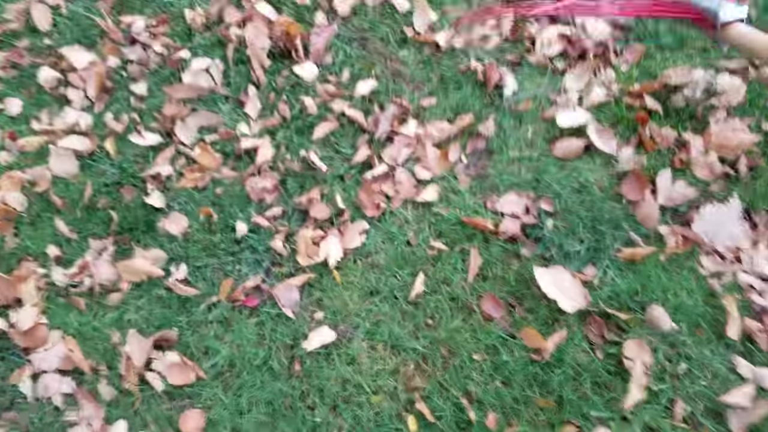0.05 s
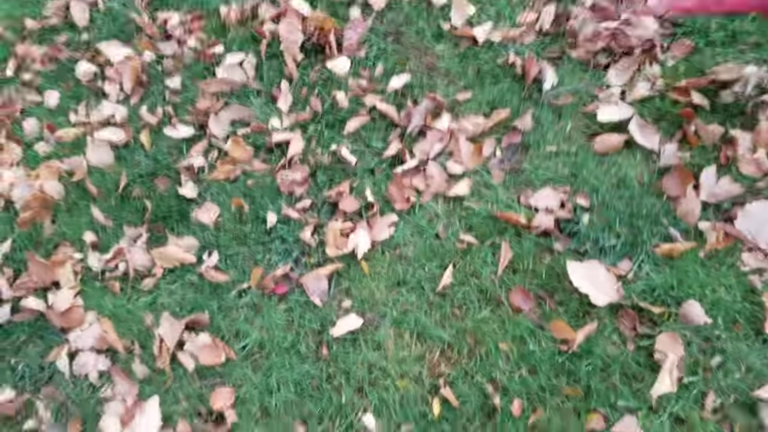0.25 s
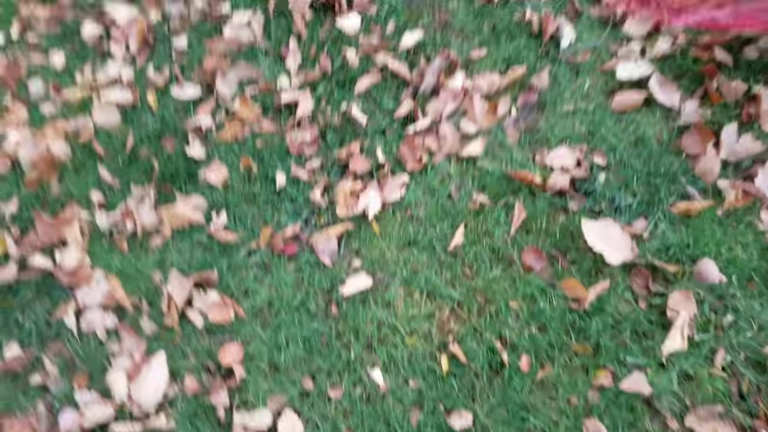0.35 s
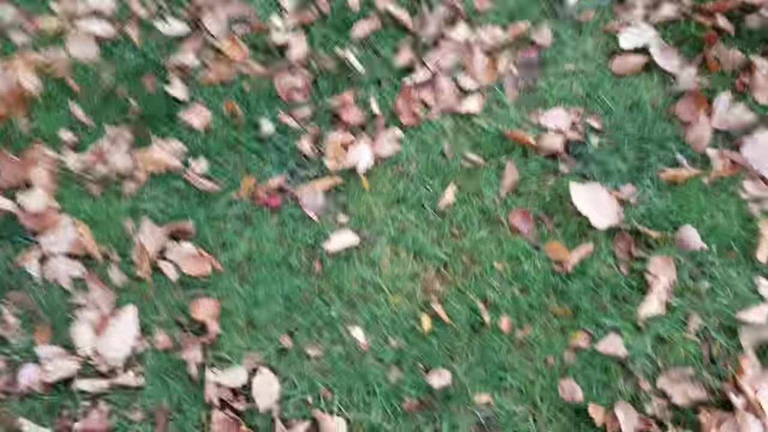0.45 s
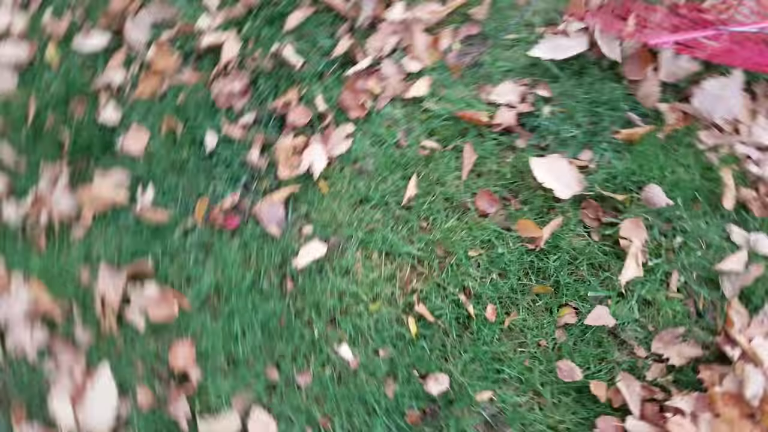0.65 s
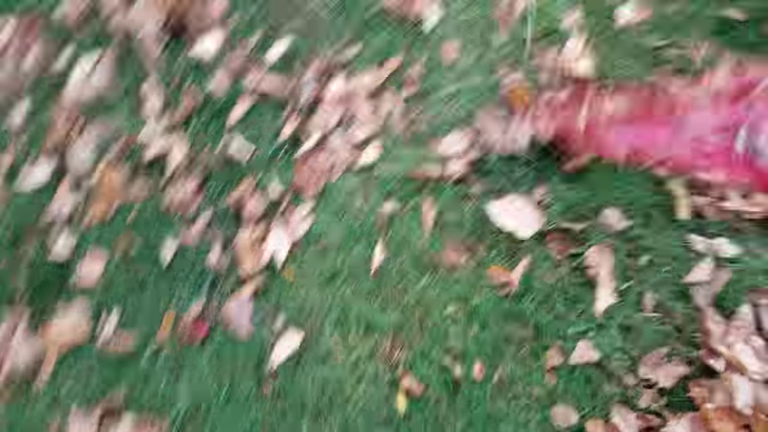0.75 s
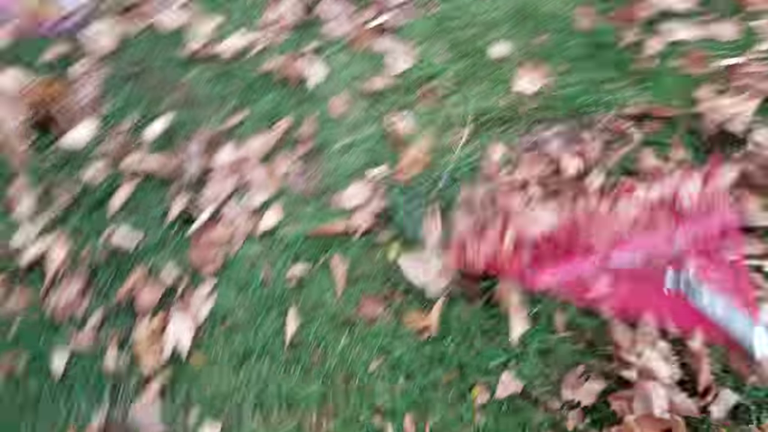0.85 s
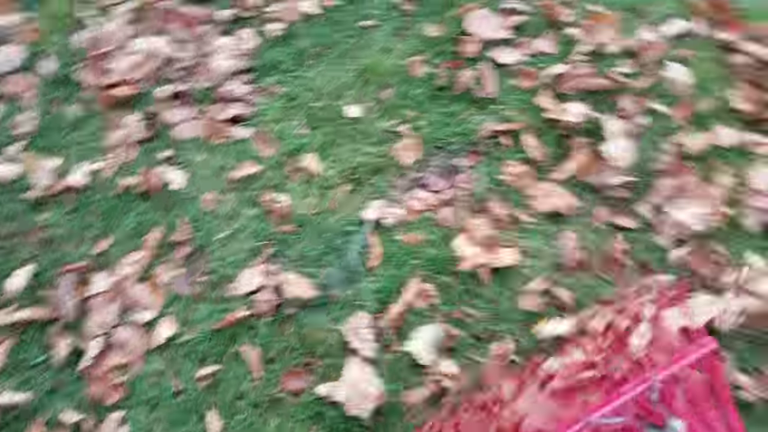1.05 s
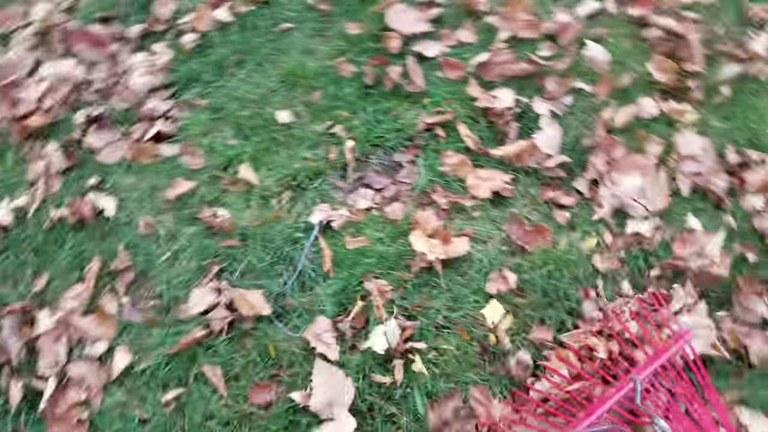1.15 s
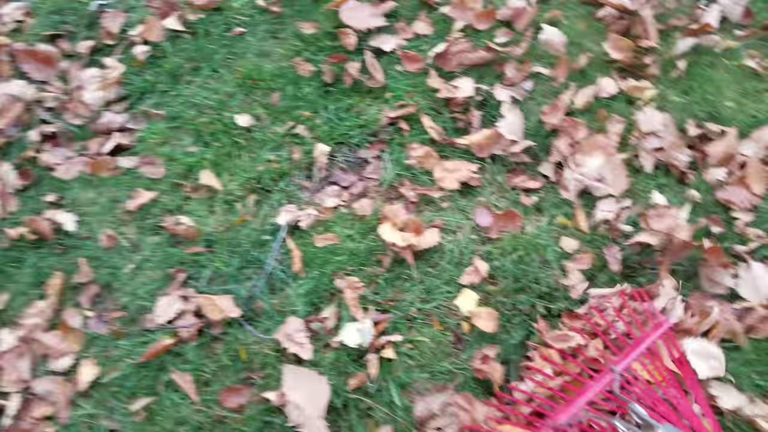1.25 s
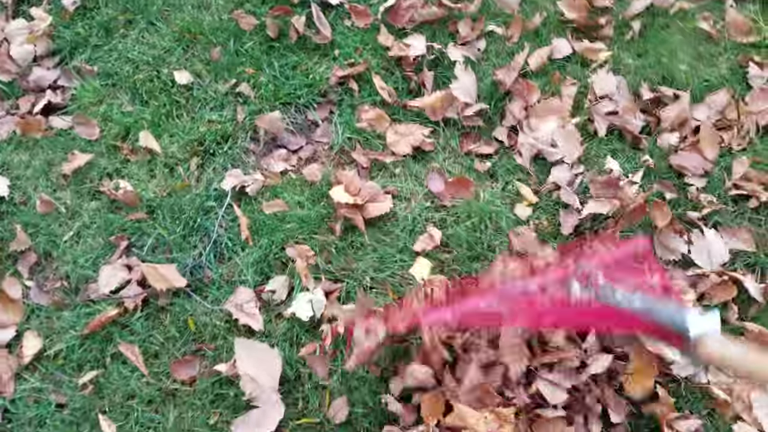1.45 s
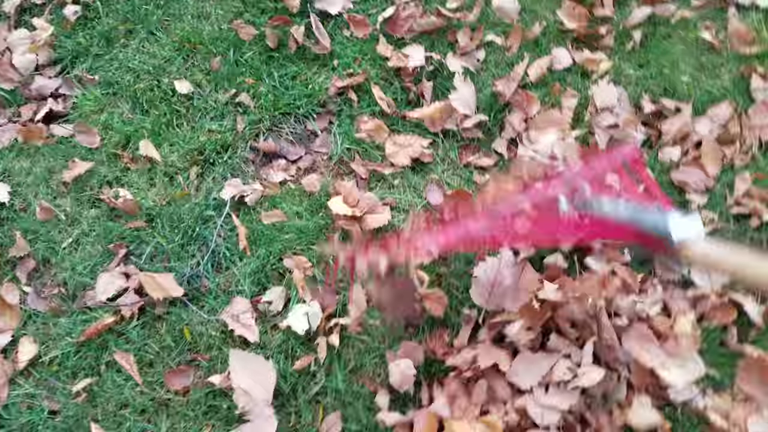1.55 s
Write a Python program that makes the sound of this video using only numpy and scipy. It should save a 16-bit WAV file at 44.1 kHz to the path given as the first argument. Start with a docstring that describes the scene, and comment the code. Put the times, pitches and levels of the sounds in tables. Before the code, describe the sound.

A plastic rake lands on a lawn with a soft thud and two dull knocks, then scrapes close past through crackling dry leaves. A few leaves snap before the stroke fades into a soft rustle and low handling rumble.

```python
"""A soft thud and two dull knocks: a plastic rake lands on a lawn and is pulled once past the listener.
Dry leaves buckle in thousands of tiny damped rings that merge into a dense crackle, lower where they
pile up. The tines scrape through the grass, clumps crunch and single brittle leaves snap.
The stroke dies away in a soft rustle and a low handling rumble, over a faint outdoor background."""
import sys
import numpy as np
from scipy import signal
from scipy.fft import rfft, irfft, next_fast_len
from scipy.io import wavfile
from scipy.ndimage import uniform_filter1d, map_coordinates

SR = 44100
rng = np.random.default_rng(int(sys.argv[2]) if len(sys.argv) > 2 else 0)


def wrap_up_sound(samples):
    """Save the sound to the file named by the first command line argument, as 16-bit audio."""
    columns = np.atleast_2d(samples).T
    # keep every value between -1 and 1, then stretch to whole-number steps
    tamed = np.clip(columns, -1, 1)
    steps = np.round(tamed * 32767).astype(np.int16)
    wavfile.write(sys.argv[1], SR, steps)


N = 70560


def amp(db):
    """Amplitude ratio of a level in decibels."""
    return 10 ** (np.asarray(db) / 20)


def unit(x):
    """Normalisation to rms 1."""
    return x / np.sqrt(np.mean(x ** 2) + 1e-20)


def along(points, hz):
    """Interpolation of (frequency_hz, value) points on a logarithmic frequency axis."""
    f, v = np.transpose(points)
    return np.interp(np.log(hz + 1), np.log(f + 1), v)


def curves(rows):
    """Linear envelopes, one for each column after time_s."""
    time_s, *columns = np.transpose(rows)
    return [np.interp(np.arange(N) / SR, time_s, c) for c in columns]


def wobble(rate_hz):
    """Random modulation: a spline through rate_hz Gaussian values a second."""
    return map_coordinates(rng.standard_normal(4096), [np.arange(N) * rate_hz / SR], mode="wrap")


def filtered(x, response):
    """Zero-phase filtering: the spectrum of x times a frequency response."""
    m = next_fast_len(N + SR // 2)
    return irfft(rfft(x, m) * response(np.fft.rfftfreq(m, 1 / SR)), m)[..., :N]


def coloured(x, spectrum):
    """Spectral shaping by (frequency_hz, gain_db) points, at rms 1."""
    return unit(filtered(x, lambda hz: amp(along(spectrum, hz))))


def band(x, centre_hz, width):
    """Band-pass filtering with a bell of the given relative width, at rms 1."""
    return unit(filtered(x, lambda hz: np.exp(-(np.log((hz + 1) / centre_hz) / width) ** 2)))


def steadied(x, size):
    """Division by the running rms evens out chance swells over size samples."""
    power = np.mean(np.atleast_2d(x) ** 2, axis=0)
    power = uniform_filter1d(uniform_filter1d(power, size), size)
    return unit(x / np.sqrt(np.abs(power) + 1e-6))


def grains(pitch_hz, scatter, cycles, size_db, spread_ms, count, size):
    """Superposition of tiny damped rings, each with its own left-right delay, whitened as a whole."""
    # Bearing of the stirred leaves, a little to the right: time_s, left_delay_ms, relative_width
    bearing = [(.25, 0.19, 0.93), (.42, 0.19, 0.76), (.6, 0.23, 1.34), (.85, 0.16, 1.03),
               (1.15, 0.12, 0.77), (1.5, 0.11, 1.3)]
    start = rng.uniform(0, N - 1, count)
    hz = pitch_hz * np.exp(scatter * rng.triangular(-2.2, 0, 2.2, count))
    hz = np.clip(hz, 200, SR * .4)[:, None]
    gain = amp(size_db * np.clip(rng.standard_normal(count), -2, 2)) * rng.choice([-1, 1], count)
    delay_ms, width = (c[start.astype(int)] for c in curves(bearing))
    lag = (delay_ms + width * spread_ms * rng.standard_normal(count)) * SR / 1000
    pair = []
    for arrival in (start + lag / 2, start - lag / 2):
        index = np.ceil(arrival).astype(int)[:, None] + np.arange(size)
        turns = (index - arrival[:, None]) * hz / SR
        ring = gain[:, None] * np.sqrt(hz) * np.sin(2 * np.pi * turns) * np.exp(-turns / cycles)
        pair.append(np.bincount(index.ravel() % N, ring.ravel(), N))
    spectrum = rfft(np.array(pair))
    power = uniform_filter1d(np.mean(np.abs(spectrum) ** 2, axis=0), size=900)
    return unit(irfft(spectrum / np.sqrt(np.abs(power) + 1e-9), N))


def blows(rows, source, width, attack_s):
    """Impact excitation: each row starts a band of the source that rises fast and decays exponentially."""
    out = 0
    for start_s, level_db, centre_hz, t60_s in rows:
        age = np.maximum(np.arange(N) / SR - start_s, 0)
        envelope = (1 - np.exp(-age / attack_s)) * amp(level_db - 60 * age / t60_s)
        out = out + envelope * steadied(band(source, centre_hz, width), size=400)
    return out


def crackle(level_db):
    """Buckling leaves emit clicks so dense that they fuse; sparser ticks of leaf edges stand out."""
    # Spectrum of dry leaves: frequency_hz, gain_db
    spectrum = [(300, -31), (1000, -19.5), (2300, -4.5), (4000, -5), (7000, -4), (7900, -3), (8600, -9.5),
                (9500, -11.5), (11000, -7.5), (13000, -5), (15100, -5)]
    dense = grains(pitch_hz=8160, scatter=.61, cycles=.94, size_db=0, spread_ms=.121, count=48000, size=48)
    edges = grains(pitch_hz=7000, scatter=.5, cycles=1.2, size_db=2.5, spread_ms=.1, count=1000, size=48)
    clumps_db = .55 * wobble(70) + .6 * wobble(400)
    fused = amp(level_db + clumps_db) * coloured(dense, spectrum)
    return fused + amp(level_db - 12) * coloured(edges, spectrum)


def heap(crackle_db):
    """Compression of the growing heap gives lower, longer rings than the crackle."""
    # Heap level relative to the crackle: time_s, level_db
    build_up = [(.22, -11.5), (.6, -9), (.85, -6.5), (.98, -8.5), (1.16, -9.5), (1.28, -5), (1.37, -11)]
    # Spectrum of the heap: frequency_hz, gain_db
    spectrum = [(500, -31), (1400, -6), (2300, 0.5), (3200, -4), (5000, -20), (9000, -66)]
    crush = grains(pitch_hz=2235, scatter=.438, cycles=4.8, size_db=2.5, spread_ms=.04,
                   count=7500, size=160)
    return amp(crackle_db + curves(build_up)[0]) * coloured(crush, spectrum)


def tines(level_db):
    """Stick-slip friction: the tines catch in the grass and ring briefly at each release."""
    # Spectrum of the scraping tines: frequency_hz, gain_db
    spectrum = [(80, -38), (270, -13), (450, -6), (650, -4.5), (810, 1), (1130, 1.5), (1550, 3), (2400, -6),
                (4000, -3.5), (9000, -69)]
    slips = grains(pitch_hz=1222, scatter=.62, cycles=1.73, size_db=.5, spread_ms=.065,
                   count=5500, size=224)
    return amp(level_db) * coloured(slips, spectrum)


def sizzle(leaf_db):
    """Amplitude-modulated narrow-band noise: a high sizzle flares while the rake drags."""
    # Sizzle level relative to leaf_db: time_s, level_db
    swell = [(.35, -22), (.48, -9.5), (.8, -15), (1.05, -9)]
    flare_db = curves(swell)[0] + 3 * wobble(90)
    return amp(leaf_db + flare_db) * band(rng.standard_normal((2, N)), centre_hz=7760, width=.072)


def patchiness(x, depth_db):
    """Random spectral ripple: narrow peaks and dips come and go in the rustle."""
    spectra = signal.stft(x, nperseg=1024)[2]
    field = uniform_filter1d(rng.standard_normal(spectra.shape[1:]), size=4, axis=0)
    field = uniform_filter1d(field, size=7, axis=1)
    return signal.istft(spectra * amp(depth_db * unit(field)), nperseg=1024)[1][:, :N]


def stroke():
    """Incoherent sources add: leaves and tines sound together from the moment of ground contact."""
    # Base envelopes of the pull: time_s, leaf_db, tine_db
    pull = [(0.188, -48, -58), (0.212, -34.5, -42.5), (0.236, -32.5, -43.5), (0.266, -39.5, -39.5),
            (0.288, -33.5, -51), (0.31, -37, -41.5), (0.43, -35.5, -41.5), (0.51, -30.5, -34.5),
            (0.6, -29, -32.5), (0.64, -29, -33), (0.72, -27, -32), (0.77, -22, -26.5), (0.82, -26, -30.5),
            (0.875, -23.5, -30.5), (0.925, -27.5, -31), (0.97, -27, -30.5), (1.02, -28, -32),
            (1.05, -27, -31.5), (1.08, -30, -31.5), (1.2, -35.5, -36.5), (1.285, -35, -38),
            (1.36, -40, -42), (1.42, -39, -44.5), (1.48, -43.5, -46.5), (1.6, -41, -48)]
    leaf_db, tine_db = curves(pull)
    crackle_db, scrape_db = leaf_db + 2, tine_db - 2.5
    contact_s, rise_s = pull[0][0], .012
    contact = np.clip((np.arange(N) / SR - contact_s) / rise_s, 0, 1)
    return contact * (crackle(crackle_db) + heap(crackle_db) + tines(scrape_db) + sizzle(leaf_db))


def snaps(t60_s=.014):
    """Brittle fracture: a leaf releases its stored strain in a burst of a few milliseconds."""
    # Breaking leaves: start_s, level_db
    fractures = [(.011, -48), (0.029, -47), (.073, -45.5), (.128, -48), (0.6445, -21), (.7626, -20),
                 (.993, -25), (1.0035, -18)]
    # Spectrum of a snap: frequency_hz, gain_db
    spectrum = [(400, -17), (2400, -3), (7800, 6), (9400, -14), (14000, 2)]
    t = np.arange(N) / SR
    bursts = sum((t >= s) * amp(db - 60 * np.abs(t - s) / t60_s) for s, db in fractures)
    crack = grains(pitch_hz=5000, scatter=.7, cycles=1.5, size_db=1, spread_ms=.07, count=20000, size=64)
    return bursts * coloured(crack, spectrum)


def crunches():
    """Damped resonance: each clump of leaves collapses under the tines with its own hollow colour."""
    # Crushed clumps: start_s, level_db, centre_hz, t60_s
    clumps = [(.175, -44, 3000, 0.033), (.212, -38.5, 1530, 0.17), (.267, -24, 2500, 0.028),
              (.276, -31.5, 2140, 0.056), (1.046, -27, 2060, 0.13), (1.15, -29, 1490, 0.04),
              (1.377, -40, 1370, .06)]
    crush = grains(pitch_hz=1800, scatter=.5, cycles=2, size_db=2, spread_ms=.05, count=6000, size=128)
    return blows(clumps, crush, width=.33, attack_s=.0016)


def landing():
    """Damped impact: the rake head thuds on the turf, then knocks twice as its fan flattens."""
    # Thud and knocks: start_s, level_db, centre_hz, t60_s
    impacts = [(.186, -52, 78, 0.1), (.208, -39.5, 690, 0.077), (.232, -33.5, 745, 0.04)]
    return blows(impacts, rng.standard_normal(N), width=.22, attack_s=.0014)


def handling():
    """Structure-borne handling noise: a low rumble, equal in both channels, as the stroke ends."""
    # Envelope of the rumble: time_s, level_db
    swell = [(1.15, -74), (1.3, -65), (1.42, -53.5), (1.46, -61), (1.5, -51), (1.6, -51.5)]
    # Spectrum of the rumble: frequency_hz, gain_db
    spectrum = [(25, -30), (60, -7), (115, 1.5), (220, -4), (330, -14), (900, -60)]
    return amp(curves(swell)[0]) * steadied(coloured(rng.standard_normal(N), spectrum), size=1200)


def outdoors(level_db=-50.5):
    """Coherence falls with frequency: far rumble is alike in both ears, the faint hiss is unrelated."""
    # Spectrum of the background: frequency_hz, gain_db
    spectrum = [(20, -28), (45, -13), (70, -5), (100, 0.5), (160, -6), (300, -6.5), (600, -3.5),
                (1100, -12.5), (3000, -15), (7800, -20.5), (9400, -28.5), (14000, -22.5)]
    coherence = [(150, .85), (700, .31), (2500, .026)]  # frequency_hz, correlation
    angle = lambda hz: np.arccos(along(coherence, hz)) / 2
    mid = filtered(rng.standard_normal(N), lambda hz: np.cos(angle(hz)))
    side = filtered(rng.standard_normal(N), lambda hz: np.sin(angle(hz)))
    return amp(level_db + 3 * wobble(25.64)) * coloured(np.array([mid + side, mid - side]), spectrum)


def scene():
    """Superposition of all sources; a level difference places the raking a little to the right."""
    # Level difference between the channels: frequency_hz, left_minus_right_db
    balance = [(200, -.5), (1200, -2), (7700, -2.5), (9200, -0.5), (11800, 0.5), (14000, -1.5)]
    rake = patchiness(stroke(), depth_db=1.3) + snaps() + crunches()
    rake = filtered(rake, lambda hz: amp(np.outer([.5, -.5], along(balance, hz))))
    return rake + landing() + handling() + outdoors()


def record(dry):
    """Band limiting: an ideal low-pass filter removes the highest treble."""
    cutoff_hz = 15650
    return filtered(dry, lambda hz: hz < cutoff_hz)


dry = scene()
out = record(dry)
wrap_up_sound(out)
```